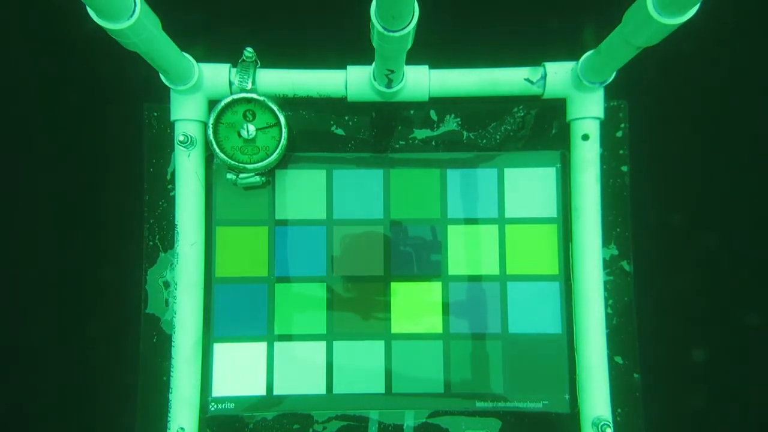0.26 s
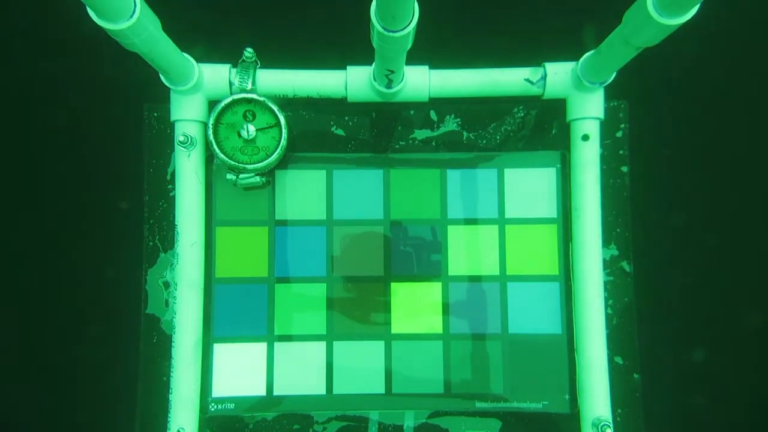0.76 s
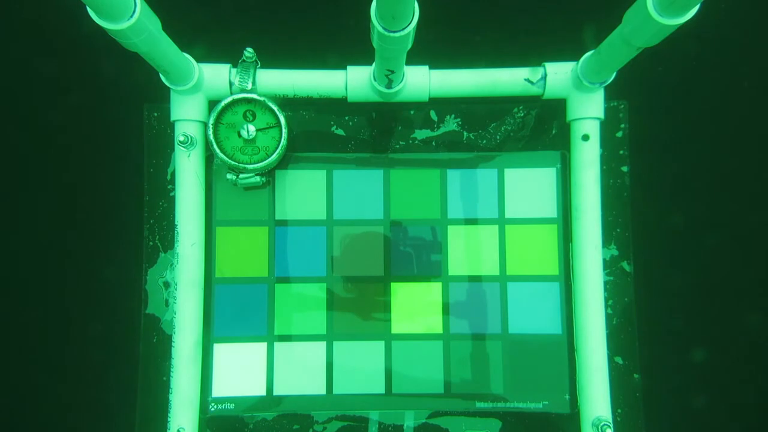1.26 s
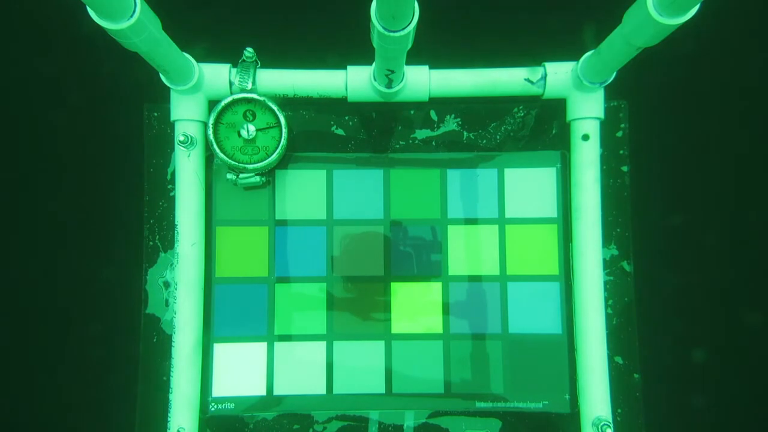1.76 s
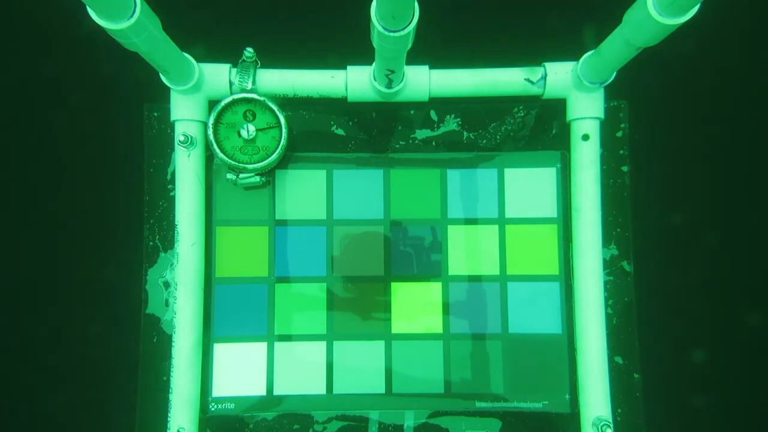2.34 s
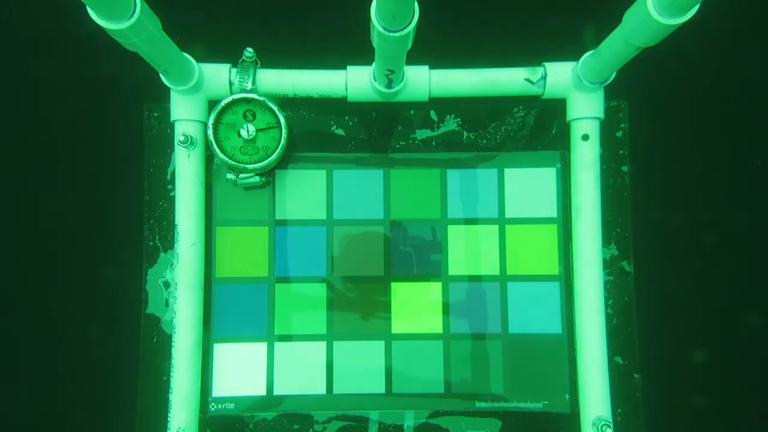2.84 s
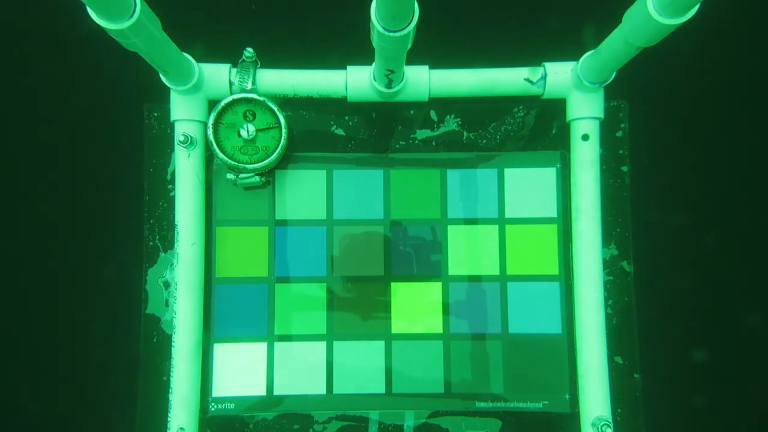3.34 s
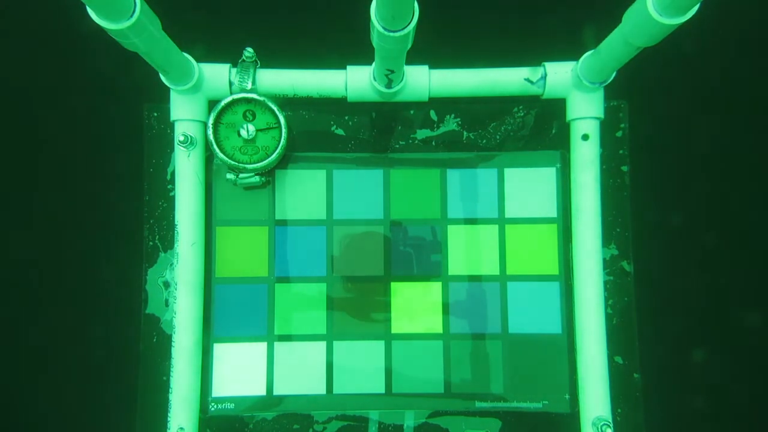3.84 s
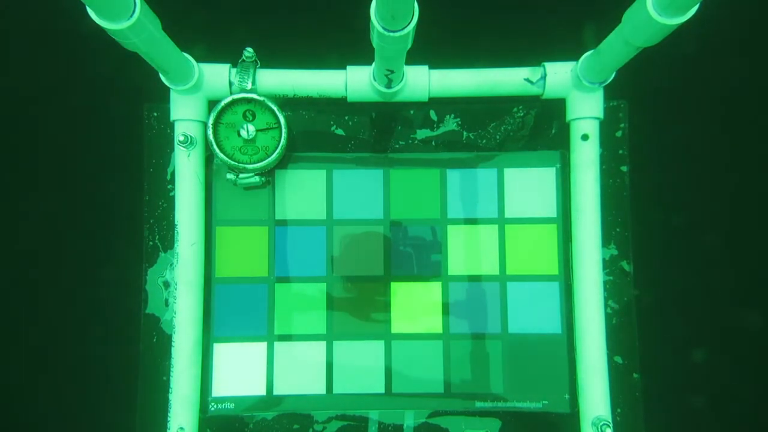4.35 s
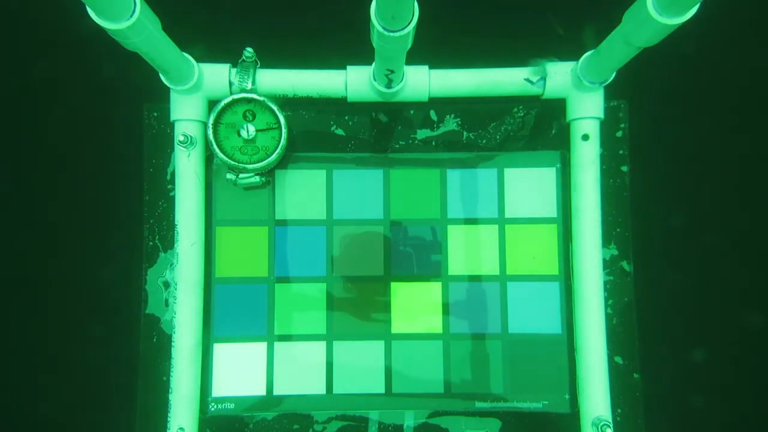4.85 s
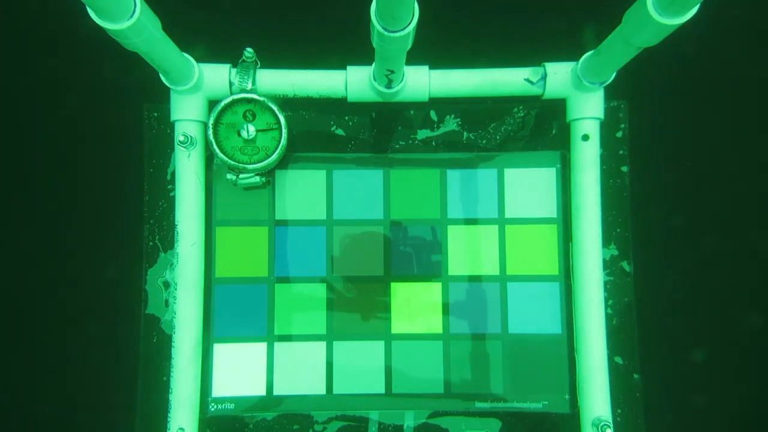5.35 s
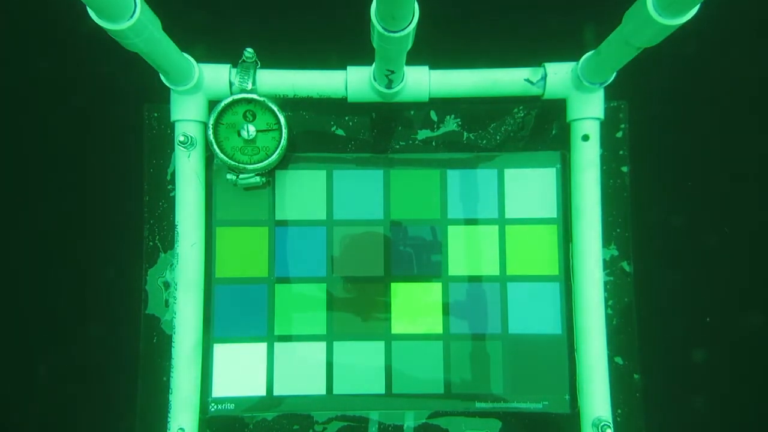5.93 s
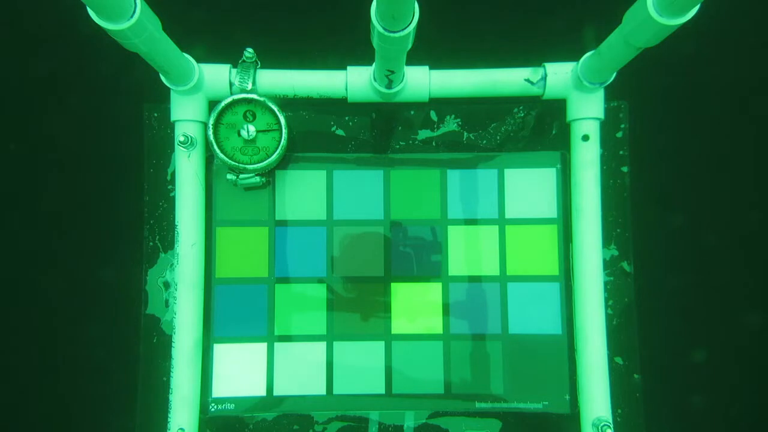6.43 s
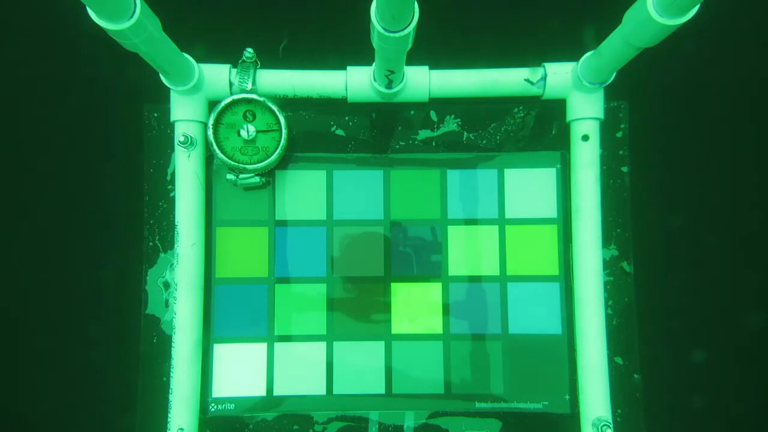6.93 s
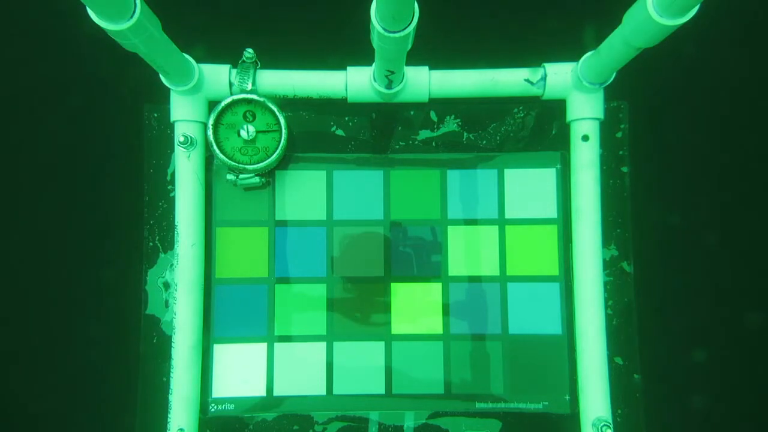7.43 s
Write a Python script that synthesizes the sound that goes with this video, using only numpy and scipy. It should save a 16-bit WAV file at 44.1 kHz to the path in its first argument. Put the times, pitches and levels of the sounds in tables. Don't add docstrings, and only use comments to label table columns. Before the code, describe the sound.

A steady, hollow, resonant hum of sea noise fills a sealed underwater housing. A quick cluster of sharp ticks and bubble blips opens it, followed by a brief gurgle. Later come isolated loud clicks, then several soft dull knocks on plastic pipes with faint creaks. Louder ticks return around five seconds, and a dense bubbly flurry comes near the end. Very close, muffled microphone with faint hiss.

```python
import sys
import numpy as np
from scipy import signal
from scipy.fft import rfft, irfft, next_fast_len
from scipy.io import wavfile

SR = 44100
rng = np.random.default_rng(int(sys.argv[2]) if len(sys.argv) > 2 else 0)


def attenuation_scalar(level_db):
    decades = np.asarray(level_db, float) / 20
    return 10 ** decades


def wav_record(signal):
    frames = np.transpose(np.atleast_2d(signal))
    bounded = np.clip(frames, -1, 1)
    quanta = np.round(bounded * 32767).astype(np.int16)
    wavfile.write(sys.argv[1], SR, quanta)


N = 338247
TIME = np.arange(N) / SR

# f/Hz, width/Hz, hum level/dB, tick level/dB, left-right/dB, left lag/ms
HOUSING_MODES = [(232, 43, -43, -16, 9, 0.024), (347.4, 73, -20, 8, 3, 0.012),
                 (565, 52, -25.5, -6, 0.5, 0.39), (708, 35.6, -5.5, -7.5, 5.5, 0.33),
                 (810, 195, -18, -4, 16, 0.338), (978.6, 40.2, 1, 2, 4.5, 0.17),
                 (1290, 44, -0.5, 0, 1, 0.032), (1594, 150, -59, -14.5, 2.5, 0.045),
                 (1953, 65, -19.5, 2.5, 6, 0.074), (2130, 66, -17.5, 0.5, -2.5, 0.059),
                 (2400, 100, -67, -6.5, -8.5, 0.021), (2764, 89, -25.5, -1, -7, 0.01),
                 (3413, 49, -51, -5, 6, 0.01), (3980, 76, -31.5, -3, -1.5, 0.017),
                 (4920, 440, -53, 3, 9.5, 0.057), (6360, 130, -29.5, -7.5, -4.5, 0.0074),
                 (8200, 11000, -82.5, -45, -75, 0.089), (10020, 480, -135, -55, 55, 0.078)]
MODE_GROUP_TOPS = [450, 1120, 1750, 3300]
# f/Hz, width/Hz, depth (0-1)
DEAD_SPOTS = [(1820, 88, 1), (3040, 2000, 0.26)]
# t/s, level/dB
SEA_STATE = [(0.0, -41.5), (0.15, -41.5), (1.69, -41.5), (2.05, -42.5), (2.37, -41), (2.54, -42),
             (3.46, -42), (3.76, -43), (4.76, -42.5), (4.93, -42.5), (5.15, -40), (5.32, -42),
             (6.92, -41.5), (7.15, -42), (7.52, -41), (7.67, -43)]
# t/s, main mode level/dB, then deep, upper and bright modes over it/dB
CLEAR_TICKS = [(0.0909, -14, -6.5, -12, -25), (0.27, -18.5, -26, -4.5, -16), (0.3528, -22.5, -27, -17, -18),
               (0.4639, -20, -12, -3.5, -23), (0.6763, -14.5, -13, -14.5, -22),
               (1.092, -34.5, 2.5, -24, -23), (1.696, -18.5, -16, -40, -26), (2.4901, -10, -25, -41, -33),
               (2.715, -43, -8, -2, -5), (3.654, -20.5, -34, -7, -27), (4.106, -33, 4, -7, -14),
               (4.924, -14.5, -16, -19, -29), (5.1672, -6.5, -22, -12, -17.5),
               (5.2064, -18, -13, -31, -18.5), (5.3967, -20, -4.5, 5, -5), (5.7684, -21, -9.5, -11, -20),
               (6.1584, -9, -18, -12, -18), (6.853, -10, -13, -7, -12.5), (7.0036, -10, -19, -33, -42),
               (7.2677, -22, -11, -31.5, -35), (7.2761, -25, -7, -45, -40.5),
               (7.3471, -18.5, -19, -29, -21), (7.3724, -17, -19, -26, -30), (.3865, -51, -12.5, -6, -1)]
# t/s, main mode level/dB, deep modes over it/dB
FAINT_TICKS = [(0.7523, -26, -20), (1.562, -40, 1), (2.0646, -40, -14), (2.2842, -42, -11),
               (3.086, -30.5, -6), (3.1192, -32, -8), (4.2276, -29, -14), (4.7143, -28, -14),
               (5.65, -30, -17), (6.104, -24, -24), (6.6605, -28.5, -24), (7.193, -35, -10),
               (7.2964, -22, -9), (7.573, -37, -6)]
# t/s, f/Hz, peak level/dB, time to
# fall 60 dB/s
STEADY_TONES = [(.0908, 919, -7, 0.02), (.095, 2160, -39, 0.093), (.101, 845, -20, 0.13),
                (.467, 3380, -49, .04), (.722, 1290, -29, 0.049), (0.758, 1350, -29, .025),
                (.681, 2100, -36, .03), (3.655, 2100, -37, .04), (1.71, 1342, -36, 0.11),
                (1.77, 1370, -35, .1), (2.063, 1290, -36, 0.028), (2.4877, 1303, -9, 0.023),
                (4.105, 993, -33, 0.04), (5.216, 1146, -22, 0.026), (5.223, 1084, -31, 0.042),
                (5.398, 2060, -31, 0.019), (5.398, 351, -33, 0.043), (5.399, 1330, -27, 0.027),
                (5.43, 1297, -30, 0.046), (6.16, 2085, -34, 0.036), (6.172, 1244, -30, .06),
                (6.858, 2060, -25, 0.025), (6.852, 1374, -18, 0.026), (6.857, 950, -28, 0.034),
                (7.003, 996, -6.5, 0.031), (7.005, 1420, -22.5, 0.049), (7.221, 1330, -28.5, .03),
                (7.2955, 1043, -9.5, 0.033), (7.299, 1550, -30.5, 0.087), (7.32, 2760, -41, 0.08),
                (7.381, 1333, -30, 0.03), (7.373, 4100, -49, .05), (7.39, 984, -34, .05)]
# t/s, start f/Hz, end f/Hz, peak level/dB, time to fall 60 dB/s
GLIDING_BUBBLES = [
    (0.0901, 1336, 1290, -4.5, 0.045),
    (0.4658, 1532, 1605, -26, 0.12),
    (0.472, 1400, 1350, -23, 0.047),
    (.809, 1300, 1280, -29, .03),
    (2.4899, 988, 886, -5.5, 0.065),
    (4.924, 1287, 1360, -0.73, 0.0092),
    (4.929, 1130, 1060, -13.5, 0.02),
    (4.932, 1350, 1350, -25, .04),
    (7.029, 980, 1065, -13.5, 0.038),
    (7.039, 1070, 1120, -21, .025),
]
# t/s, start f/Hz, end f/Hz, peak level/dB, length/s
SWELLING_BUBBLES = [
    (4.927, 1082, 964, -20, 0.043),
    (7.007, 932, 1003, -7.5, .036),
    (5.204, 1290, 1210, -16.5, 0.023),
    (5.648, 913, 854, -26.5, 0.032),
    (7.043, 1210, 1484, -20.5, 0.038),
    (7.1736, 1290, 1375, -9, 0.019),
    (7.284, 1203, 1410, -13.5, 0.048),
    (7.307, 1140, 1345, -16.5, 0.034),
    (7.356, 1260, 1410, -23, 0.026),
]
# t/s, f/Hz, peak level/dB
SHORT_PINGS = [(0.092, 520, -30), (0.0923, 2680, -33), (.1581, 4150, -40), (.3862, 9060, -40),
               (.3868, 11500, -56), (.4635, 2215, -24), (0.465, 1497, -9), (.4662, 3520, -40),
               (0.47, 1370, -23), (.6767, 706, -31), (0.6785, 9040, -34), (.6788, 10200, -52),
               (0.7467, 1010, -27), (2.0687, 1290, -40), (2.4885, 2400, -27.5), (2.7144, 2400, -39),
               (3.6541, 2130, -26), (3.8481, 2700, -48), (3.9741, 2650, -47), (4.1062, 1010, -36),
               (4.3491, 2730, -47), (4.9231, 9500, -46), (4.9297, 1290, -16), (5.1673, 4040, -36),
               (5.1672, 880, -27), (5.1672, 2310, -24), (5.2042, 10000, -51), (5.2052, 1650, -34),
               (5.2058, 8450, -38), (5.2068, 6300, -41), (5.3968, 2430, -24), (5.398, 1600, -27),
               (5.3978, 6300, -38), (5.649, 1290, -32), (5.7692, 1020, -26), (6.159, 3220, -27.5),
               (6.1602, 1020, -21), (6.8522, 4900, -25), (6.8524, 560, -21), (6.8528, 760, -19.5),
               (.271, 2090, -33.5), (7.0033, 2710, -37), (7.0062, 1360, -21), (7.1736, 960, -27),
               (7.2682, 940, -19.5), (7.2715, 910, -25), (7.275, 1005, -21), (7.2795, 1060, -35),
               (7.2978, 2660, -29.5), (7.3012, 1320, -22), (7.3045, 1060, -12.5), (7.3325, 1370, -22),
               (7.345, 6400, -36), (7.347, 6100, -31.5), (7.3488, 1020, -26), (7.353, 1250, -27),
               (7.3555, 3400, -48), (7.356, 5000, -38), (7.362, 5100, -47), (7.3731, 1680, -30)]
# t/s, f/Hz, peak level/dB
WATER_GULPS = [
    (.825, 92, -47),
    (0.861, 66.6, -41),
    (0.923, 63.4, -48),
    (.96, 60, -55),
    (1.01, 56, -59),
    (4.439, 66, -69),
]
# t/s, left-right over the housing's own lean/dB
BUBBLE_PLACES = [(0.09, -1.5), (.46, 0), (2.07, 0.5), (2.49, 4), (3.65, -7), (4.92, 1.5), (5.2, 2.5),
                 (5.65, -2), (7.0, 1.5), (7.18, 0.5), (7.3, 1.5), (7.38, 2)]
# t/s, start f/Hz, end f/Hz, peak level/dB, length/s
CLINGING_BUBBLES = [
    (0.107, 1320, 1416, -19.5, 0.058),
    (0.775, 1343, 1352, -26, 0.052),
    (7.321, 1310, 1370, -6.5, .012),
    (7.372, 1330, 1370, -16.5, .011),
]
# t/s, length/s, centre f/Hz, width/Hz, level/dB
SEAL_GURGLES = [(0.748, 0.1, 2060, 500, -53), (0.829, 0.069, 420, 600, -46), (0.861, 0.093, 200, 300, -63),
                (7.297, 0.044, 720, 400, -38), (0.822, 0.045, 1140, 700, -42),
                (7.263, 0.062, 730, 298, -37.5), (7.298, 0.092, 1910, 900, -46.5),
                (7.345, .04, 3500, 1200, -59), (7.346, .04, 950, 350, -39), (7.574, 0.031, 760, 500, -40),
                (7.575, 0.032, 2050, 397, -54)]
# t/s, peak level/dB, f/Hz, time to fall 60 dB/s, left-right/dB
PIPE_KNOCKS = [(0.247, -42.5, 373, 0.13, 1.5), (0.828, -39, 371, 0.09, 4), (2.998, -33, 356, 0.12, 5),
               (3.007, -40, 375, 0.056, 2.5), (3.031, -40, 350, .08, 2.5), (3.354, -46, 250, 0.062, -1.5),
               (3.895, -32.5, 293, 0.044, 6), (4.02, -33.5, 298, 0.052, 3.5),
               (4.267, -33.5, 292, 0.04, -1.0), (4.396, -26.5, 298, 0.035, 1.0),
               (4.517, -29.5, 308, 0.033, 5), (4.629, -51, 320, 0.16, 14), (7.574, -35.5, 378, 0.091, 1),
               (7.59, -45, 372, .07, 1)]
# t/s, length/s, start f/Hz, end f/Hz, level/dB
JOINT_CREAKS = [(3.898, 0.056, 2170, 2150, -56), (3.971, 0.083, 2160, 2250, -57),
                (4.001, 0.84, 2710, 2756, -71.5), (4.37, 0.055, 2200, 2160, -62),
                (4.479, 0.044, 2350, 2400, -58), (4.483, 0.12, 2180, 2230, -64),
                (4.706, 0.055, 2240, 2270, -52.5), (4.709, 0.17, 2360, 2370, -68),
                (6.295, 0.072, 2230, 2250, -54.5), (6.389, 0.055, 2260, 2220, -63),
                (6.546, .06, 2230, 2200, -58), (6.621, 0.094, 2260, 2270, -59.5),
                (7.069, 0.079, 2430, 2400, -53.5), (7.072, 0.077, 2255, 2200, -49.5),
                (7.08, .06, 2150, 2100, -60), (7.133, 0.08, 2290, 2270, -52.5),
                (7.187, 0.036, 1980, 2120, -48)]
# t/s, peak level/dB
WATER_SURGES = [(.04, -66), (.28, -57), (.68, -65.5), (.87, -55), (1.11, -66), (1.43, -67), (1.77, -71),
                (2.5, -71), (2.84, -66), (3.54, -67), (3.76, -73), (4.12, -63), (4.46, -61.5), (5.17, -68),
                (5.4, -69), (5.64, -64), (5.79, -63), (6.16, -69), (6.86, -67), (7.2, -69)]
# f/Hz, level per Hz/dB
HISS_OPPOSED = [(20, -81), (100, -82.5), (200, -80), (350, -79), (500, -80), (1500, -80.5), (3000, -87.5),
                (5000, -92.5), (8000, -96.5), (11000, -101), (15000, -106), (16000, -112)]
# f/Hz, level per Hz/dB
HISS_ALIKE = [(20, -94.5), (90, -99), (140, -98), (250, -94), (500, -88), (1500, -94), (3000, -99),
              (5000, -98.5), (8000, -100), (11000, -104), (15000, -109), (16000, -114)]
# f/Hz, then the level/dB of each tone left and right
WHINE_HZ = [7866.9, 15733.7, 15747.8]
WHINE_LEFT = [-74, -82, -87]
WHINE_RIGHT = [-58, -66, -71]


def rms_one(x):
    return x / np.sqrt(np.mean(x ** 2) + 1e-20)


def drift(rate_hz):
    r = np.exp(-80 * np.pi * rate_hz / SR)
    slow = signal.lfilter([1], [1, -2 * r, r * r], rng.standard_normal(N // 40 + 2002))[2000:]
    return np.interp(np.arange(N) / 40, np.arange(len(slow)), rms_one(slow))


def resonate(x, hz, width_hz):
    r = np.exp(-np.pi * width_hz / SR)
    top = (1 - r * r) / 2
    return signal.lfilter([top, 0, -top], [1, -2 * r * np.cos(2 * np.pi * hz / SR), r * r], x + 1e-18)


def struck(clicks, hz, width_hz, contact_cycles):
    def ring(x):
        return resonate(resonate(x, hz, hz / contact_cycles), hz, width_hz)
    one_click = np.arange(SR // 20) == 0
    return ring(clicks) / np.abs(ring(one_click)).max()


def ports(x, pan_db, lag_ms):
    at = np.arange(len(x))
    left = np.interp(at - lag_ms * SR / 1000, at, x)
    return np.array([attenuation_scalar(pan_db / 2) * left, attenuation_scalar(-pan_db / 2) * x])


def add(out, s, tone, pan_db, lag_ms):
    i = round(s * SR)
    out[:, i:i + len(tone)] += ports(tone, pan_db, lag_ms)[:, :N - i]


def housing_at(hz, column):
    modes = np.array(HOUSING_MODES)
    return np.interp(hz, modes[:, 0], modes[:, column])


def sea_noise(grains_per_s, spread_db, grain_db):
    sizes = attenuation_scalar(spread_db * np.minimum(rng.exponential(1, N), 4)) * rng.choice([-1, 1], N)
    snaps = sizes * (rng.random(N) < grains_per_s / SR)
    return rng.standard_normal(N) + attenuation_scalar(grain_db) * rms_one(snaps)


def housing_hum():
    sea = sea_noise(60.0, spread_db=3.0, grain_db=-11.5)
    hum = 0
    for k, (hz, width_hz, sea_db, _, pan_db, lag_ms) in enumerate(HOUSING_MODES):
        flicker = attenuation_scalar(sea_db + 1.6 * drift(6.0))
        hum = hum + (-1) ** k * ports(flicker * resonate(sea, hz, width_hz), pan_db, lag_ms)
    for hz, width_hz, depth in DEAD_SPOTS:
        hum = hum - depth * resonate(hum, hz, width_hz)
    hum_db = np.interp(TIME, *np.transpose(SEA_STATE)) + 2.5
    return attenuation_scalar(hum_db + 0.42 * drift(4.2)) * rms_one(hum)


def frame_ticks():
    faint = [row + (-19.5, -23) for row in FAINT_TICKS]
    s, main_db, deep_db, upper_db, bright_db = np.array(CLEAR_TICKS + faint).T
    at = np.round(s * SR).astype(int)
    lowest_db = deep_db - 15.5
    share_db = np.array([lowest_db, deep_db, 0 * deep_db, upper_db, bright_db])
    hits = 0
    for k, (hz, width_hz, _, tick_db, pan_db, lag_ms) in enumerate(HOUSING_MODES):
        chance = rng.standard_normal((2, len(at)))
        group_db = share_db[np.searchsorted(MODE_GROUP_TOPS, hz)]
        strength = attenuation_scalar(main_db + group_db + tick_db + 1.5 * chance[0])
        clicks = np.zeros(N)
        clicks[at] = 0.5 * strength
        again = round(np.ceil(0.0014 * hz) / hz * SR)
        clicks[at + again] = 0.19 * strength * attenuation_scalar(1.8 * chance[1])
        damped_hz = 1.17 * width_hz + 0.031 * hz
        ring = struck(clicks, hz, damped_hz, contact_cycles=1.6)
        hits = hits + (-1) ** k * ports(ring, pan_db, lag_ms)

    crack = np.zeros(N)
    crack[at + round(0.0007 * SR)] = attenuation_scalar(main_db + bright_db - 4)
    snap = crack - 0.73 * np.roll(crack, round(0.0009 * SR))
    snap = signal.lfilter(*signal.butter(2, 6300, fs=SR), snap)
    hits = hits + resonate(snap, 1800, 4500) * attenuation_scalar(np.array([[-1.5], [1.5]]))

    push = np.zeros(N)
    push[at] = attenuation_scalar(main_db + lowest_db - 16)
    return hits + struck(push, 127, 127, contact_cycles=0.59)


def fizz():
    out, t = np.zeros((2, N)), np.arange(SR // 20) / SR
    fizz_hz, fall_s = 3700, 0.027
    for s, db, _, _, bright_db in CLEAR_TICKS:
        rattle = resonate(rng.standard_normal(len(t)), fizz_hz, fizz_hz)
        add(out, s, attenuation_scalar(db + bright_db - 4.5 - 60 * t / fall_s) * rattle, 0.1, 0.02)
    return out


def bubble_rows():
    rows = [(s, hz, hz, db, 0.0037, t60) for s, hz, db, t60 in STEADY_TONES]
    rows += [(s, hz, end_hz, db, 0.00296, t60) for s, hz, end_hz, db, t60 in GLIDING_BUBBLES]
    swell = 0.41
    for s, hz, end_hz, db, length in SWELLING_BUBBLES:
        rows.append((s, hz, end_hz, db, swell * length, (1 - swell) * length))
    rows += [(s, hz, hz, db, 0.0014, min(0.013, 47 / hz)) for s, hz, db in SHORT_PINGS]
    rows += [(s, hz, 0.86 * hz, db, 0.024, 0.11) for s, hz, db in WATER_GULPS]
    return rows


def bubbles():
    out = np.zeros((2, N))
    for s, start_hz, end_hz, db, rise, t60 in bubble_rows():
        t = np.arange(round((rise + t60) * SR)) / SR
        hz = start_hz + (end_hz - start_hz) * np.minimum(t / (rise + t60 / 2), 1)
        swell = np.sin(np.pi / 2 * np.minimum(t / rise, 1)) ** 2
        fall = attenuation_scalar(-60 * (np.maximum(t - rise, 0) / t60) ** 1.29)
        tone = attenuation_scalar(db) * swell * fall * np.sin(2 * np.pi * np.cumsum(hz) / SR)
        pan_db = np.interp(s, *np.transpose(BUBBLE_PLACES)) + 0.49 * housing_at(start_hz, 4)
        add(out, s, tone, pan_db, housing_at(start_hz, 5))
    return out


def clinging_bubbles():
    out = np.zeros((2, N))
    for s, start_hz, end_hz, db, length in CLINGING_BUBBLES:
        along = np.linspace(0, 1, round(length * SR))
        shape = signal.windows.tukey(len(along), 0.32) * attenuation_scalar(db - 7.5 * along)
        hz = start_hz + (end_hz - start_hz) * along
        add(out, s, shape * np.sin(2 * np.pi * np.cumsum(hz) / SR), 1.5, 0.03)
    return out


def gurgles(grains_per_s=2500):
    out = np.zeros((2, N))
    for s, length, hz, width_hz, db in SEAL_GURGLES:
        draw = rng.random((3, SR // 5))
        grains = (draw[0] < grains_per_s / SR) * np.log(draw[1] + 1e-9) * np.sign(draw[2] - 0.5)
        stirred = resonate(resonate(grains, hz, width_hz), hz, width_hz)
        burst = rms_one(stirred)[:round(length * SR)]
        add(out, s, attenuation_scalar(db) * signal.windows.tukey(len(burst), 0.3) * burst, 2.5, 0.1)
    return out


def knocks():
    out = np.zeros((2, N))
    for s, db, hz, t60, pan_db in PIPE_KNOCKS:
        t = np.arange(round(t60 * SR)) / SR
        push = np.sin(np.pi / 2 * np.minimum(t / 0.0071, 1)) ** 2
        shape = push * attenuation_scalar(db + 2.5 - 60 * t / t60)
        thud = 0.41 * np.sin(2 * np.pi * 0.795 * hz * t) * attenuation_scalar(-300 * t)
        add(out, s, shape * (np.sin(2 * np.pi * hz * t) + thud), pan_db, 0.05)
    return out


def creaks(rough_hz=80):
    out, r = np.zeros((2, N)), np.exp(-2 * np.pi * rough_hz / SR)
    wander = signal.lfilter([1], [1, -2 * r, r * r], rng.standard_normal((2, N)))
    wander = 1.6 + rms_one(wander[0]) + 1j * rms_one(wander[1])
    for s, length, start_hz, end_hz, db in JOINT_CREAKS:
        pan_db = housing_at(start_hz, 4) - 1.5
        count = min(round(length * SR), N)
        i = round((s + start_hz / SR) * SR)
        line = np.exp(2j * np.pi * np.cumsum(np.linspace(start_hz, end_hz, count)) / SR)
        rub = np.real(line * np.roll(wander, -i)[:count])
        add(out, s, attenuation_scalar(db) * signal.windows.tukey(count, 0.4) * rub, pan_db, 0.05)
    return out


def band_noise(order, low_hz, high_hz):
    band = signal.butter(order, [low_hz, high_hz], "band", fs=SR, output="sos")
    return rms_one(signal.sosfilt(band, rng.standard_normal(N)))


def surges():
    level_db = np.full(N, -82.5)
    for s, db in WATER_SURGES:
        away_db = np.maximum(231 * (s - TIME), 113 * (TIME - s))
        level_db = np.maximum(level_db, db - away_db)
    push = attenuation_scalar(level_db + 0.91 * drift(11.0)) * band_noise(3, 48, 100)
    slosh = attenuation_scalar(-76.5 + 3.0 * drift(1.5)) * band_noise(2, 18, 40)
    return ports(push + slosh, 1.5, 0.12)


def coloured(spectrum):
    hz, db = np.transpose(spectrum)
    size = next_fast_len(N)
    bins_hz = np.arange(size // 2 + 1) * SR / size
    gain = attenuation_scalar(np.interp(np.log(bins_hz + 1), np.log(hz), db))
    return irfft(rfft(rng.standard_normal(size)) * gain, size)[:N] * np.sqrt(SR / 2)


def preamp():
    hiss = coloured(HISS_ALIKE) + coloured(HISS_OPPOSED) * [[1], [-1]]
    tones = np.sqrt(2) * np.sin(2 * np.pi * np.outer(WHINE_HZ, TIME))
    return hiss + attenuation_scalar(np.array([WHINE_LEFT, WHINE_RIGHT])) @ tones


def scene():
    near = housing_hum() + frame_ticks() + fizz()
    water = bubbles() + clinging_bubbles() + gurgles()
    return near + water + knocks() + creaks() + surges() + preamp()


def top_cut(x):
    return signal.sosfilt(signal.butter(12, 16450, fs=SR, output="sos"), x)


def record(dry):
    level_db = 20 * np.log10(np.abs(dry).max(axis=0) + 1e-9)
    over_db = 0.5 * np.maximum(level_db + 9.0, 0)
    climb_db = 13.8 * TIME
    held_db = np.maximum.accumulate(over_db + climb_db) - climb_db
    r = np.exp(-1 / (0.0082 * SR))
    duck = attenuation_scalar(-signal.lfilter([1 - r], [1, -r], held_db))
    clipped = np.clip(dry * duck, -1, 1)
    top = signal.ellip(12, 0.5, 70, 15960, fs=SR, output="sos")
    return top_cut(signal.sosfilt(top, clipped))


dry = scene()
out = record(dry)
wav_record(out)
```